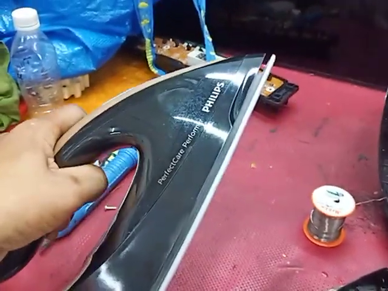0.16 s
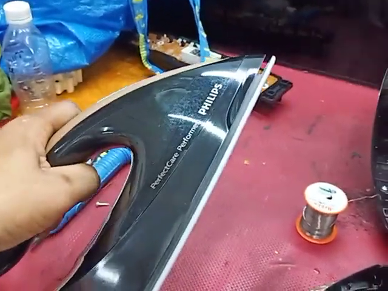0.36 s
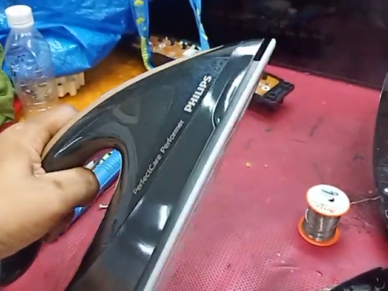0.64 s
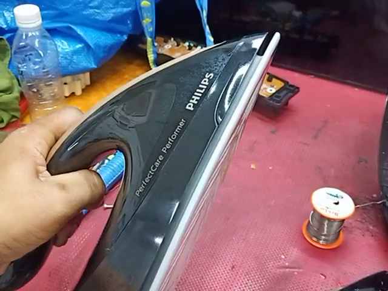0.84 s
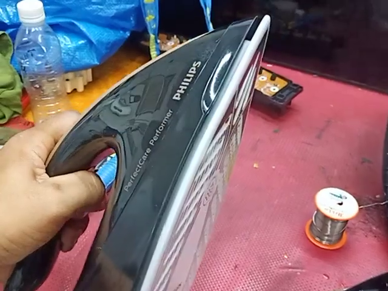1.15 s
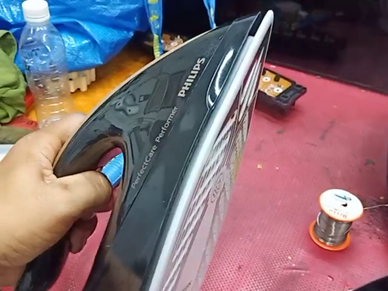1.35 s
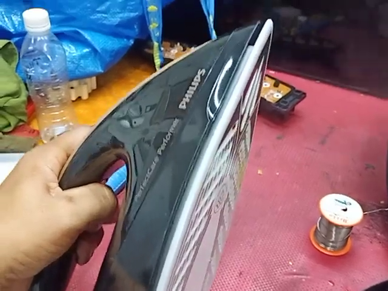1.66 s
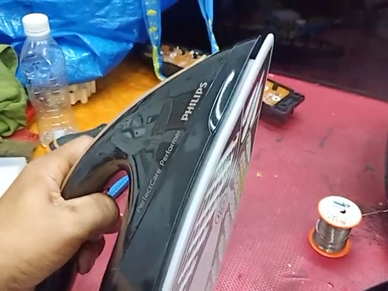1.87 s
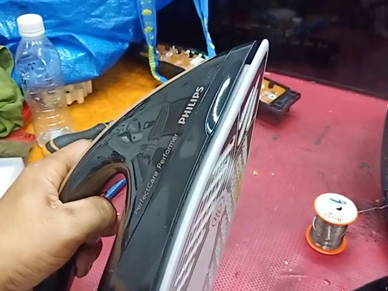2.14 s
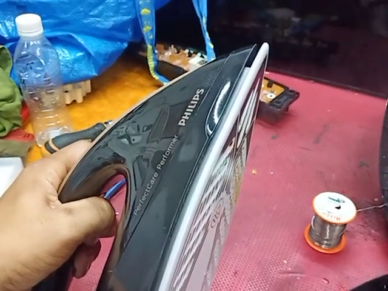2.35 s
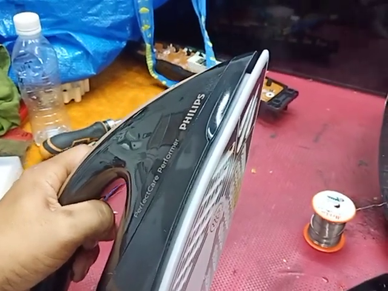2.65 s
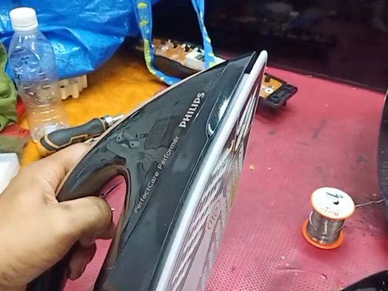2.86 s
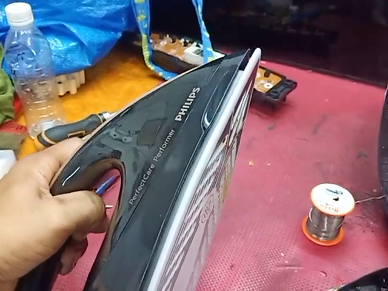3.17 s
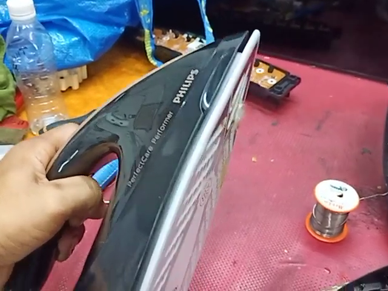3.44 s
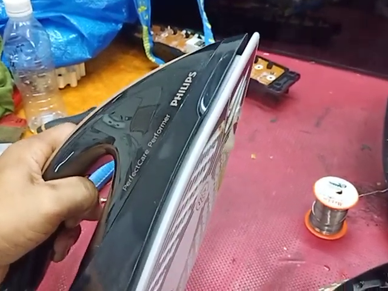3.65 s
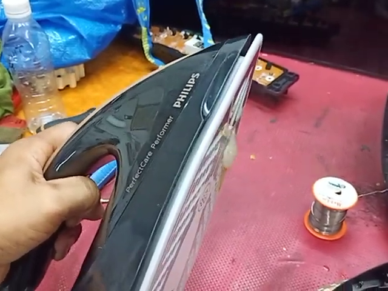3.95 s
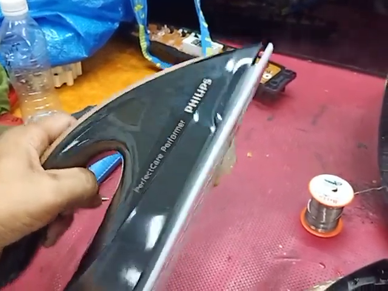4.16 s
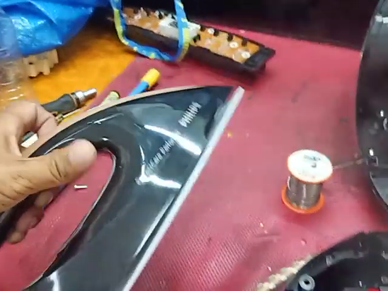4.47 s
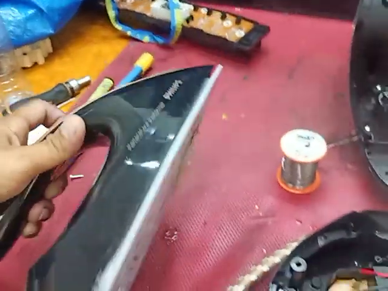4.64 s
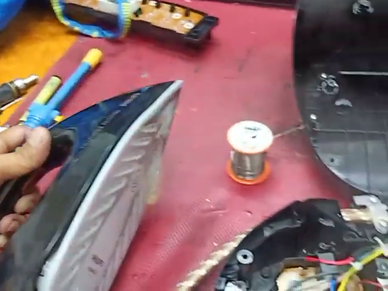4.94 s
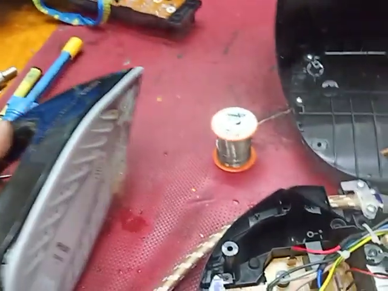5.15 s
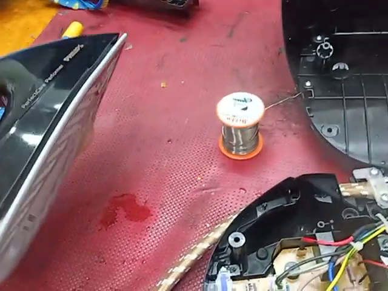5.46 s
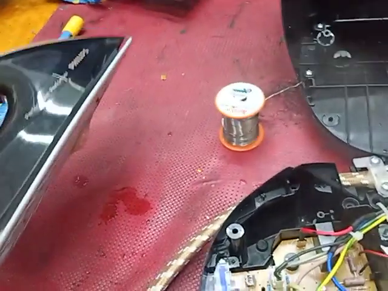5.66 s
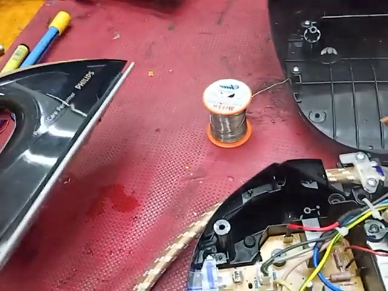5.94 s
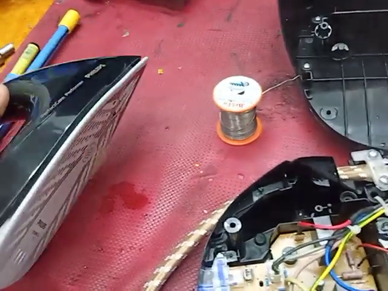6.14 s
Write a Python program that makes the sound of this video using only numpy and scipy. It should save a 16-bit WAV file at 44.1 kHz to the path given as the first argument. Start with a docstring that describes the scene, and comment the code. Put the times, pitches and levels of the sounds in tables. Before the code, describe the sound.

Very close to the microphone in a small workshop, a steam iron starts with weak sputtering puffs, wet crackling spits and hollow gulps while a small pump ticks rapidly. Near two seconds a sharp blast breaks through and becomes a steady, rough hiss over a low gurgling hum. The ticking stops past four seconds, the hiss peaks and sweeps in colour as the iron swings, then drops and thins.

```python
"""Steam hisses from an iron held over a workbench, close to the microphone: noise roughened by flashing droplets.
Water spits crack and thud on the hot plate, and the pump ticks twice a stroke, as shaped noise bursts.
Under it the steam chamber gurgles and hums: noise through resonances, with ringing bubbles.
Moving echoes off nearby surfaces sweep the hiss's colour as the iron is swung aside and the steam eases.
A short workshop tail lies behind the jet and the spits."""
import sys
import numpy as np
from scipy import signal
from scipy.fft import rfft, irfft
from scipy.io import wavfile
from scipy.ndimage import uniform_filter1d, map_coordinates

SR = 44100
rng = np.random.default_rng(int(sys.argv[2]) if len(sys.argv) > 2 else 0)


def wav_record(signal):
    """Record a signal, one row per channel, as 16-bit PCM in the file named by sys.argv[1]."""
    frames = np.transpose(np.atleast_2d(signal))
    bounded = np.clip(frames, -1, 1)
    # unit amplitude maps onto the largest positive 16-bit level
    quanta = np.round(bounded * 32767).astype(np.int16)
    wavfile.write(sys.argv[1], SR, quanta)


N = 277874
T = np.arange(N) / SR


def jet():
    """Turbulent steam, roughened by droplets that flash off the hot plate."""
    return balance(tone(broad_hiss())) * undb(flow_and_level())


# Spectrum of the soleplate holes; balance() resets the levels between bands.
# Columns: pitch_hz [Hz], level_db [dB]
HOLE_SPECTRUM = [(480, -31), (670, -25.5), (850, -6), (1050, -6.5), (1480, -9), (2200, 1), (3600, 1),
                 (4800, -4.5), (6000, -2), (7200, -6.5), (8400, -12), (11500, -19.5), (13500, -20),
                 (15500, -19.5)]


def broad_hiss(flutter_db=0.74, drop_db=-6, drop_decay_s=0.0058):
    """Flow noise of the holes, with a burst of extra power as each droplet flashes."""
    when, size = rng.random((1100, 2)).T
    size_db = 2.8 * np.minimum(-np.log(1 - size), 3.6)
    drops = bursts(when * N / SR, undb(drop_db + size_db), drop_decay_s)
    rough = noise() * np.sqrt(1 + drops ** 2) * undb(flutter_db * walk(45))
    return colour(rough, HOLE_SPECTRUM)


# Steam channels in the soleplate, heard best from the front; levels are over the broad hiss with no swing.
# Columns: pitch_hz [Hz], width_hz [Hz], level_db [dB]
STEAM_CHANNELS = [(2284, 97, -22), (2640, 55, -6.5), (3520, 320, -8.5), (4310, 160, -11.5),
                  (5860, 200, -8.5), (6730, 310, -6.5)]
CHANNELS_ASIDE_DB = -32  # change at a swing share of 1
# Resonances of the wet steam before the plate is fully blowing; levels are over the broad hiss.
# Columns: pitch_hz [Hz], width_hz [Hz], level_db [dB]
WET_RESONANCES = [(1970, 770, -3), (4900, 630, -9)]
SHARP_PUFF_DB = 9  # a puff this strong is fully dry and sharp
# the first full blast breaks through sharp and mellows; its level is over the hiss it is added to
BLAST_S, BLAST_FADE_S, BLAST_HZ, BLAST_WIDTH_HZ, BLAST_DB = 1.75, 1, 3670, 1800, -4.5


def tone(hiss, slack_db=-5, slack_hz=4050, slack_width_hz=1500):
    """Resonances of the channels and of the steam as it goes from wet to dry to slack."""
    swing, = curves(SWING_ASIDE)
    hiss = hiss + undb(CHANNELS_ASIDE_DB * swing) * resonances(hiss, STEAM_CHANNELS)
    # wet steam rasps lower; a puff dries it for a moment and sounds as sharp as the first blast
    sharp = np.clip(puffs() / SHARP_PUFF_DB, 0, 1) ** 2
    wet = np.interp(T, [1.7, 2.0], [1, 0]) * (1 - sharp)
    hiss = hiss + wet * resonances(hiss, WET_RESONANCES)
    blast = sharp + (T > BLAST_S) * np.exp(-np.abs(T - BLAST_S) / BLAST_FADE_S)
    hiss = hiss + blast * undb(BLAST_DB) * resonate(hiss, BLAST_HZ, BLAST_WIDTH_HZ)
    # as the plate dries and the steam goes slack, the hiss gathers in one broad band
    slack = (drying() + spent()) / 2
    return hiss + slack * undb(slack_db) * resonate(hiss, slack_hz, slack_width_hz)


# the jet sweeps past the microphone, which lifts the upper hiss
AIM_S, AIM_WIDTH_S, AIM_DB = 4.84, 0.25, 3


def balance(hiss, rush_db=-14.5, rush_slope=0.32, full_flow_db=-29, rush_wander_db=1,
            bright_db=-3.5, spent_bright_db=-0.5,
            sizzle_db=-17.5, pressure_sizzle_db=4.5, spent_sizzle_db=4.5, bench_sizzle_db=1):
    """A weak jet is mostly low rush; pressure adds top sizzle; the upper hiss is beamed."""
    rush = rush_db + rush_slope * np.maximum(full_flow_db - flow_and_level(), 0)
    sizzle = sizzle_db + pressure_sizzle_db * pressure()
    sizzle = sizzle + spent_sizzle_db * spent() + bench_sizzle_db * glance()
    aim = np.exp(-((T - AIM_S) / AIM_WIDTH_S) ** 2)
    bright = bright_db + AIM_DB * aim + spent_bright_db * spent()
    low, upper, top = band(hiss, 100, 1700), band(hiss, 4550, 7900), band(hiss, 7900, 20000)
    middle = unit(hiss - low - upper - top)
    core = (middle + unit(upper) * undb(bright)) / np.sqrt(1 + undb(bright) ** 2)
    low = unit(low) * undb(rush + rush_wander_db * walk(25))
    return core + low + unit(top) * undb(sizzle)


def flow_and_level():
    """Level of the jet in dB, drawn once so that its loudness and colour surge together."""
    if not SURGING_LEVEL:
        SURGING_LEVEL.append(flow())
    return SURGING_LEVEL[0]


SURGING_LEVEL = []
# Steady steam flow, before puffs and surging. Columns: time_s [s], level_db [dB]
STEAM_FLOW = [(0, -48), (.19, -48), (.3, -42), (.78, -40.5), (.9, -39.5), (1.1, -38), (1.3, -37.5),
              (1.45, -39), (1.72, -37), (1.76, -30), (1.93, -32), (2.1, -32.5), (2.6, -29.5), (4.1, -27),
              (4.42, -28.5), (4.6, -25), (4.8, -23.5), (5.1, -27), (5.45, -28), (5.53, -31.5),
              (6.15, -33.5), (6.3, -35)]


def flow(surge_db=0.5):
    """Level of the jet in dB: the steady flow, puffs on top, and a slight surging."""
    level, = curves(STEAM_FLOW)
    return level + puffs() + surge_db * walk(18)


# Puffs as a slug of water flashes to steam; lift is over the flow.
# Columns: peak_s [s], rise_s [s], lift_db [dB]
STEAM_PUFFS = [(.09, 0.075, 5.5), (.245, 0.067, 5.5), (0.352, 0.039, 9), (.912, .02, 3), (1.012, 0.098, 9),
               (1.58, 0.044, 5), (2.81, 0.018, 2)]
PUFF_DECAY_S = 0.031


def puffs():
    """Lift of the flow in dB as slugs of water flash to steam."""
    lift = np.zeros(N)
    for peak_s, rise_s, lift_db in STEAM_PUFFS:
        rise = np.clip(1 + (T - peak_s) / rise_s, 0, 1)
        lift += lift_db * rise * np.exp(-np.maximum(T - peak_s, 0) / PUFF_DECAY_S)
    return lift


# chamber pressure builds once the plate is wet through, holds, then collapses
PRESSURE_START_S, PRESSURE_RISE_S, PRESSURE_END_S, PRESSURE_FALL_S = 1.93, 0.6, 5.56, 0.15


def pressure():
    """Steam pressure in the chamber, 0-1: attack, hold, quick release."""
    return np.clip((T - PRESSURE_START_S) / PRESSURE_RISE_S, 0, 1) * (1 - spent())


def spent():
    """0 until the chamber pressure starts to collapse, 1 once it has collapsed."""
    return np.clip((T - PRESSURE_END_S) / PRESSURE_FALL_S, 0, 1)


def drying(dry_s=0.66):
    """0 while the pump feeds water, 1 once the last of it has boiled off the plate."""
    return np.clip((T - PUMP_STOP_S) / dry_s, 0, 1)


# in mid-swing the jet points at the bench and its echoes grow
GLANCE_S, GLANCE_WIDTH_S, GLANCE_DB = 4.55, .3, 2


def glance():
    """0-1: how squarely the jet points at the bench in mid-swing."""
    return np.exp(-((T - GLANCE_S) / GLANCE_WIDTH_S) ** 2)


def roar(hz=690, width_hz=170, roar_db=-30, bench_db=6, dry_db=-8, waver_db=2):
    """Hollow resonance of the wet jet: sputters without pressure, swells off the bench, fades as the plate dries."""
    level, = curves(STEAM_FLOW)
    hollow = unit(resonate(resonate(noise(), hz, width_hz), hz, width_hz))
    sputter = waver_db * (1 + 2 * (1 - pressure()) * (1 - spent())) * walk(20)
    return hollow * undb(level + roar_db + bench_db * glance() + dry_db * drying() ** 2 + sputter)


# Spits of water; the crack and thud trims in spits() are added to these levels.
# Columns: start_s [s], level_db [dB], thud_db relative to the crack [dB]
WATER_SPITS = [(0.169, -25, -15), (0.24, -26, -17), (0.627, -27, -19), (0.741, -25, -14), (0.807, -21, -23),
               (0.935, -23, -12), (1.232, -29, -15), (1.617, -21, -14), (1.758, -20, -14.5),
               (3.099, -16, -32), (3.409, -17, -34), (3.417, -17, -34), (3.691, -12, -25),
               (4.794, -13, -31), (4.99, -11, -33), (5.015, -12, -25)]
# Ring of the soleplate under a spit. Columns: pitch_hz [Hz], level_db [dB]
CRACK_SPECTRUM = [(500, -22), (1100, -7), (2300, 0), (3600, -2), (6000, -8), (9000, -19), (15000, -28)]
# Spectrum of the hollow thud. Columns: pitch_hz [Hz], level_db [dB]
THUD_SPECTRUM = [(90, -45), (300, 10), (520, -18), (750, 10), (1050, 3), (1600, 1), (4000, -33)]


def spits(crack_db=-3, crack_decay_s=.001, thud_db=1.5, thud_decay_s=.006):
    """Larger drops burst with a crack and a short hollow thud."""
    s, db, low_db = np.transpose(WATER_SPITS)
    crack = colour(noise() * bursts(s, undb(db + crack_db), crack_decay_s), CRACK_SPECTRUM)
    thud = colour(noise() * bursts(s, undb(db + low_db + thud_db), thud_decay_s), THUD_SPECTRUM)
    return crack + thud


# Spectrum of the pump tick. Columns: pitch_hz [Hz], level_db [dB]
TICK_SPECTRUM = [(3000, -11), (6500, -10), (9000, -3), (12000, -11), (14300, 1.5), (15500, -5)]


def pump(pull_db=-35, return_db=-34, pull_decay_s=0.0054, return_decay_s=0.0021,
         tail_db=-18, tail_decay_s=0.032):
    """Every stroke is a fine, gritty double tick: the plunger pulls in and springs back."""
    s = strokes()
    pull_size, return_size = undb(rng.standard_normal((2, len(s))))
    pull = bursts(s, pull_size * undb(pull_db), pull_decay_s)
    back = bursts(s + PUMP_RETURN_S, return_size * undb(return_db), return_decay_s)
    tail = bursts(s + PUMP_RETURN_S, return_size * undb(return_db + tail_db), tail_decay_s)
    grit = undb(3.5 * walk(1400))
    swell = uniform_filter1d(uniform_filter1d(pull + back + tail, size=110), size=110)
    return colour(noise() * grit * swell, TICK_SPECTRUM)


# first stroke, trigger released; period of a pair, delay of its second stroke, delay of the plunger's return
PUMP_START_S, PUMP_STOP_S = .0820, 4.35
PUMP_PERIOD_S, PUMP_SECOND_S, PUMP_RETURN_S = .3, .14, .0098


def strokes():
    """Times of the pump strokes, which come in uneven pairs."""
    pairs = np.arange(PUMP_START_S, PUMP_STOP_S, PUMP_PERIOD_S)
    s = np.concatenate([pairs, pairs + PUMP_SECOND_S])
    return s[s < PUMP_STOP_S]


# Steam chamber resonances; boiling() widens each and applies it twice.
# Columns: pitch_hz [Hz], width_hz before widening [Hz], level_db [dB]
CHAMBER_RESONANCES = [(80, 32, -6), (110, 26, -6.5), (262, 31, -9), (312, 58, -4), (419, 43, -7.5)]
# main chamber resonance; it sings out as the chamber dries after the pump stops
HUM_HZ, HUM_WIDTH_HZ, HUM_DB, HUM_GROWTH_DB_PER_S = 162.8, 14.6, 2, 6
HUM_WANDER = .035  # share of its pitch


def boiling(gulp_db=5.0, steady_db=1.5, trim_db=-1, bubble_db=-6, dry_bubble_db=-10,
            widen=1.47, hollow_hz=535, hollow_width_hz=90):
    """Boiling shakes the chamber: in gulps while the flow is weak, as a wavering, gurgling hum once strong."""
    uneven_db = np.interp(T, [1.8, 2.6], [gulp_db, steady_db])
    gurgle = np.zeros(N)
    # each gulp favours other resonances
    for hz, width_hz, db in CHAMBER_RESONANCES:
        ring = resonate(resonate(noise(), hz, widen * width_hz), hz, widen * width_hz)
        gurgle += undb(db + uneven_db * walk(35)) * ring
    gurgle = gurgle - resonate(gurgle, hollow_hz, hollow_width_hz)
    # sloshing water bends the main resonance
    hum_db = HUM_DB + HUM_GROWTH_DB_PER_S * np.clip(T - PUMP_STOP_S, 0, 1)
    hum = undb(hum_db) * resonate(noise(), HUM_HZ, HUM_WIDTH_HZ)
    hum = map_coordinates(hum, [np.cumsum(1 + HUM_WANDER * walk(9))], order=1, mode="mirror")
    body = band(gurgle + hum, 54, 630, order=3)
    slow_rms = np.sqrt(uniform_filter1d(body ** 2, size=SR // 12))
    glugging = undb(bubble_db + dry_bubble_db * drying()) * (1 - spent()) * bubbles()
    return (body / slow_rms + glugging) * boil_strength() * undb(trim_db)


# every pump stroke is followed by a small gulp; the last value is extra at full pressure
GULP_DELAY_S, GULP_LENGTH_S, GULP_DB, GULP_PRESSURE_DB = 0.0035, 0.076, -57, 4
THROB_DB = 1.7  # throb of the rolling boil on a dry plate; 1.5 times this while the pump feeds water
# a large gulp is a rough shake and one large bubble that rings and bends (share of its pitch)
GULP_SHAKE_DB, GULP_RING_DB, GULP_BEND = -2.5, -4, .25


def boil_strength(simmer_db=-65, simmer_wander_db=3.0, spent_simmer_db=-2,
                  rolling_db=-51.0, growth_db_per_s=0.4):
    """Amplitude of the boiling: a simmer, a rolling boil under pressure, and gulps that swell and fade."""
    wander_db = simmer_wander_db * walk(28) * (1 - spent() / 2)
    simmer = undb(simmer_db + wander_db + spent_simmer_db * spent())
    growth_db = growth_db_per_s * (T - PRESSURE_START_S - PRESSURE_RISE_S)
    throb_db = THROB_DB * (1.5 - drying() / 2) * walk(21.97)
    rolling = undb(rolling_db + growth_db + throb_db)
    force = pressure()
    power = simmer ** 2 + force * (1 - spent()) * rolling ** 2
    gulps = [(s, length_s, db + GULP_SHAKE_DB) for s, length_s, db, _ in LARGE_GULPS]
    for s in strokes():
        db = GULP_DB + GULP_PRESSURE_DB * np.interp(s, T, force)
        gulps.append((s + GULP_DELAY_S, GULP_LENGTH_S, db))
    for s, length_s, db in gulps:
        inside = (T > s) & (T < s + length_s)
        power[inside] += (undb(db) * np.sin(np.pi * (T[inside] - s) / length_s)) ** 2
    return np.sqrt(power)


# Large gulps of boiling water; the shake and ring trims are added to these levels.
# Columns: start_s [s], length_s [s], level_db [dB], pitch_hz at mid-gulp [Hz]
LARGE_GULPS = [(.1, .048, -52, 303), (.162, 0.054, -54, 282), (.24, 0.053, -52, 295),
               (.302, 0.052, -51, 336), (.621, .028, -46, 310), (.665, 0.054, -49, 306),
               (.768, .032, -48, 323), (.8, .08, -45, 162.5), (1.018, 0.029, -46.5, 296),
               (1.285, 0.067, -48, 278), (1.345, .079, -55, 96), (1.655, 0.045, -45.5, 158),
               (1.746, 0.032, -41.5, 298), (1.8, 0.082, -45.5, 113), (3.125, .09, -48, 156),
               (3.982, 0.064, -43.5, 295), (4.17, 0.11, -42, 162), (4.79, 0.14, -42, 158.8),
               (4.96, .07, -42.5, 174), (5.33, 0.11, -49.5, 168), (5.58, 0.079, -50.5, 163.6)]


def glugs():
    """The large bubble of each gulp rings at its own pitch, bending up or down."""
    out = np.zeros(N)
    for (s, length_s, db, hz), (bend, start) in zip(LARGE_GULPS, rng.random((len(LARGE_GULPS), 2))):
        inside = (T > s) & (T < s + length_s)
        age = (T[inside] - s) / length_s
        bent_hz = hz * (1 + GULP_BEND * (2 * bend - 1) * (age - .5))
        cycles = start + np.cumsum(bent_hz) / SR
        ring = np.sqrt(2) * np.sin(2 * np.pi * cycles)
        out[inside] += undb(db + GULP_RING_DB) * np.sin(np.pi * age) * ring
    return out


# pitch range before the glide, cycles of ring, glide as a share of the cycles
BUBBLE_HZ, BUBBLE_CYCLES, BUBBLE_GLIDE = (108.7, 366), 3.4, 0.16


def bubbles(count=110, size_range_db=6):
    """Single bubbles glug in the chamber, each at its own pitch, bending up or down."""
    out, t = np.zeros(N + SR // 4), T[:SR // 4]
    for when, pitch, bend, size in rng.random((count, 4)):
        cycles = BUBBLE_HZ[0] * (BUBBLE_HZ[1] / BUBBLE_HZ[0]) ** pitch * t
        age = cycles / BUBBLE_CYCLES
        glide = 1 + BUBBLE_GLIDE * (2 * bend - 1) * np.tanh(age / 2)
        ring = np.sin(2 * np.pi * cycles * glide)
        start = int(when * N)
        out[start:start + len(t)] += undb(size_range_db * size) * ring * np.minimum(cycles, 1) * np.exp(-age)
    return unit(out[:N])


# How far the iron is tipped up. Columns: time_s [s], tilt [share, about 0-1]
TIP_UP = [(.4, -.1), (.9, .84), (1.4, 1.16), (2.6, .69), (3.1, .36), (4.08, .21)]
# How far it is swung aside. Columns: time_s [s], swing [share, about 0-1]
SWING_ASIDE = [(4.08, 0), (4.2, .17), (4.35, .52), (4.55, .74), (4.95, .97), (5.2, .96), (5.55, .92),
               (5.7, 1.01), (5.88, 1.075), (6.02, 1.045), (6.1, 1.06), (6.18, 1.12), (6.3, 1.18)]
# Surfaces that echo the jet while it faces them; the common echo strength multiplies the gains.
# Columns: start_s [s], end_s [s], lag_ms [ms], tipped_change_ms [ms], swung_change_ms [ms], gain [signed ratio]
SURFACE_ECHOES = [(0, 4.3, 1.966, .162, -.988, .1), (0, 5.6, .578, .08, -.261, -.09),
                  (0, 6.6, .844, .176, -.586, .14), (0, 4.35, 2.642, .169, -.557, .16),
                  (.4, 4.9, 1.055, .163, -.529, .12), (.4, 5.7, 1.237, .06, -.61, -.11),
                  (4, 5.15, 1.709, 0, -.457, -.1), (4.25, 4.75, .86, 0, -.386, .08),
                  (4.2, 4.7, 1.83, 0, -.52, .1), (4.95, 5.7, 2.3, 0, -.54, -.09),
                  (4.5, 5.3, 1.325, 0, -.617, .08), (4.75, 6.6, 1.502, 0, -.413, .08),
                  (5.2, 6.6, 1.03, 0, -.633, -.13), (5.7, 6.2, 1.228, 0, -.72, -.1),
                  (5.35, 6.2, .22, 0, 0, -.1), (5.15, 6.25, .982, 0, -.633, .23),
                  (5.75, 6.6, .878, 0, .039, .11)]
ECHO_DB, ECHO_FADE_S = 3, .17
# turned away, the soleplate shades the direct treble, so the echoes cut deeper there
SHADE_S, SHADE_WIDTH_S, SHADE_HZ, SHADE_SHARE = 6.02, .24, 7500, .3


def reflections(x):
    """Nearby surfaces return the sound later: combs that come, glide and go as the iron is tipped and swung."""
    (tip,), (swing,) = curves(TIP_UP), curves(SWING_ASIDE)
    strength = undb(ECHO_DB + GLANCE_DB * glance())
    shade = SHADE_SHARE * np.exp(-((T - SHADE_S) / SHADE_WIDTH_S) ** 2)
    direct = x - shade * band(x, SHADE_HZ, 20000, order=2)
    out, power = direct + strength * clutter(x, swing), 1
    for from_s, until_s, rest_ms, tip_ms, swing_ms, size in SURFACE_ECHOES:
        facing = .5 + .5 * np.tanh(np.minimum(T - from_s, until_s - T) / ECHO_FADE_S)
        gain = strength * size * facing
        out = out + gain * delayed(x, rest_ms + tip_ms * tip + swing_ms * swing)
        power = power + gain ** 2
    return out / np.sqrt(power)


def clutter(x, swing, count=16, near_ms=1, far_ms=4, shrink=0.382, clutter_db=-29):
    """Many faint echoes off small things on the bench; their paths shorten as the iron is swung."""
    out = 0
    for place, sign in rng.random((count, 2)):
        lag_ms = (near_ms + (far_ms - near_ms) * place) * (1 - shrink * swing)
        out = out + np.sign(sign - .5) * undb(clutter_db) * delayed(x, lag_ms)
    return out


def delayed(x, lag_ms):
    """The sound heard after a lag that may move."""
    return map_coordinates(x, [(T - lag_ms / 1000) * SR], order=2)


def room(x, wet_db=-18, t60_s=0.21):
    """Short diffuse tail of a small workshop: filtered noise dying away exponentially."""
    t = T[:SR // 2]
    decay = np.exp(-np.log(1000) * t / t60_s) * (t > .003)
    tail = band(rng.standard_normal(len(t)), 126, 6500, order=1) * decay
    return x + undb(wet_db) * signal.fftconvolve(x, tail / np.linalg.norm(tail))[:N]


def resonate(x, hz, width_hz):
    """One resonance, gain 1 at its centre."""
    return signal.lfilter(*signal.iirpeak(hz, hz / width_hz, SR), x)


def resonances(x, table):
    """Sum of the resonances in a table of pitch_hz, width_hz and level_db."""
    return sum(undb(db) * resonate(x, hz, width_hz) for hz, width_hz, db in table)


def undb(db):
    """Decibels to gain."""
    return 10 ** (np.asarray(db) / 20)


def unit(x):
    """Scale to rms 1."""
    return x / np.sqrt(np.mean(x ** 2))


def curves(table):
    """Each column of a table at every sample."""
    s, *columns = np.transpose(table)
    return [np.interp(T, s, c) for c in columns]


def colour(x, points):
    """Causal minimum-phase filter with the given (Hz, dB) shape and unit power gain."""
    hz, db = np.transpose(points)
    size = 4096
    f = np.maximum(np.fft.rfftfreq(size, 1 / SR), 1)
    cepstrum = irfft(np.log(undb(np.interp(np.log(f), np.log(hz), db))))
    # folding the cepstrum forward makes the response causal
    cepstrum[1:size // 2] *= 2
    cepstrum[size // 2 + 1:] = 0
    response = irfft(np.exp(rfft(cepstrum)))
    return signal.fftconvolve(x, response / np.linalg.norm(response))[:N]


def band(x, lo_hz, hi_hz, order=4):
    """Band-pass without phase shift."""
    return signal.sosfiltfilt(signal.butter(order, [lo_hz, hi_hz], "band", fs=SR, output="sos"), x)


def walk(rate):
    """Smooth random wander of rms 1, drawing about rate new values a second."""
    k = max(int(SR / rate), 1)
    steps = np.repeat(rng.standard_normal(N // k + 1), k)
    return unit(uniform_filter1d(uniform_filter1d(steps, k), k // 2 + 1)[:N])


def bursts(times, sizes, decay_s):
    """Envelope that jumps at each time and dies away; overlaps add in power."""
    power = np.zeros(N)
    np.add.at(power, np.clip((np.asarray(times) * SR).astype(int), 0, N - 1), np.square(sizes))
    return np.sqrt(signal.lfilter([1], [1, -np.exp(-2 / (decay_s * SR))], power + 1e-18))


def noise():
    """White noise of spread 1."""
    return rng.standard_normal(N)


def scene():
    """Steam, spits, boiling and pump at the bench, close to the microphone."""
    hissing = room(reflections(jet() + spits()))
    return (hissing + roar() + boiling() + glugs() + pump())[None]


def record(dry, top_hz=15600):
    """The recorder cuts the top with a steep low-pass."""
    return signal.sosfilt(signal.ellip(12, .1, 80, top_hz, fs=SR, output="sos"), dry)


dry = scene()
out = record(dry)
wav_record(out)
```